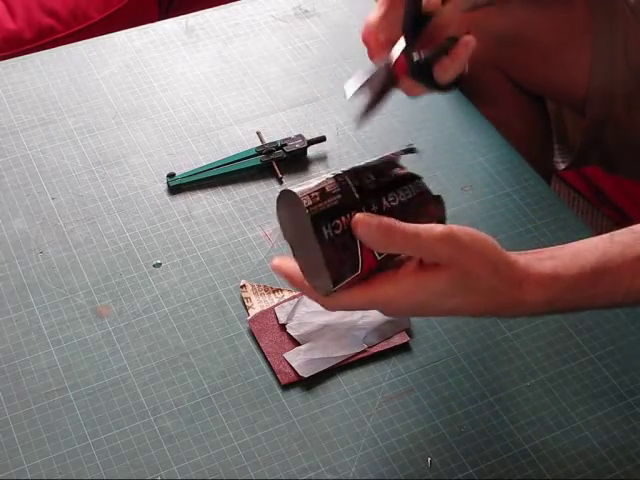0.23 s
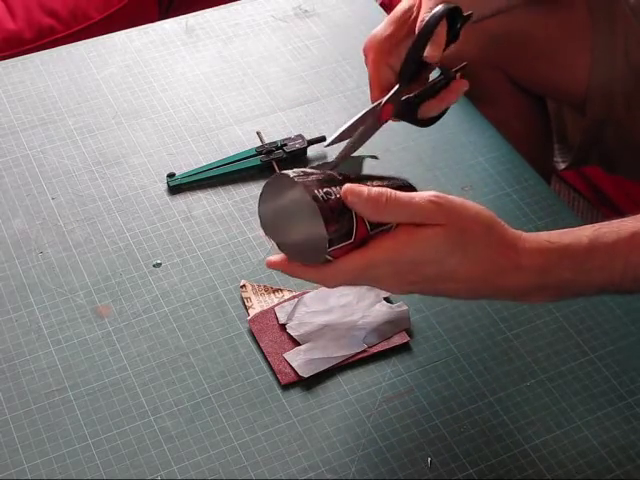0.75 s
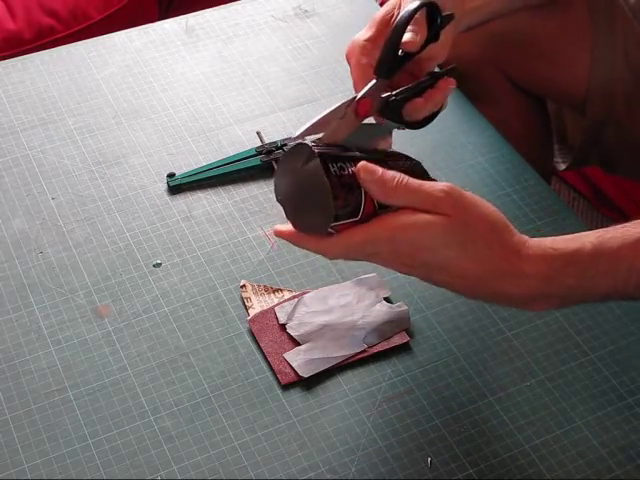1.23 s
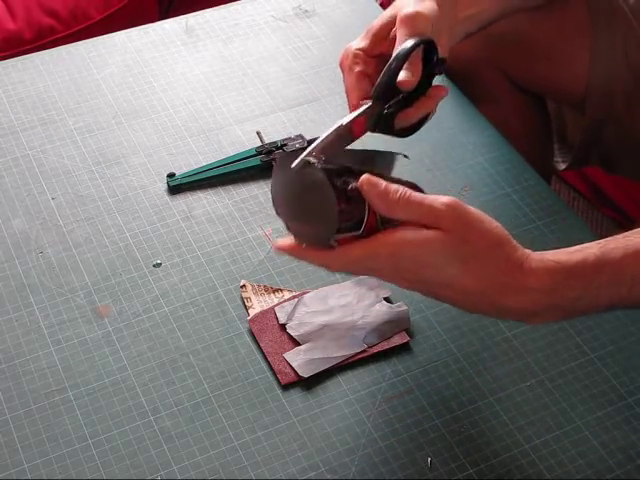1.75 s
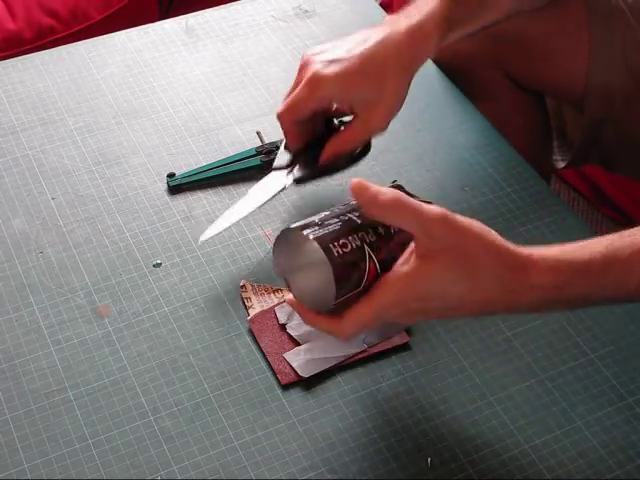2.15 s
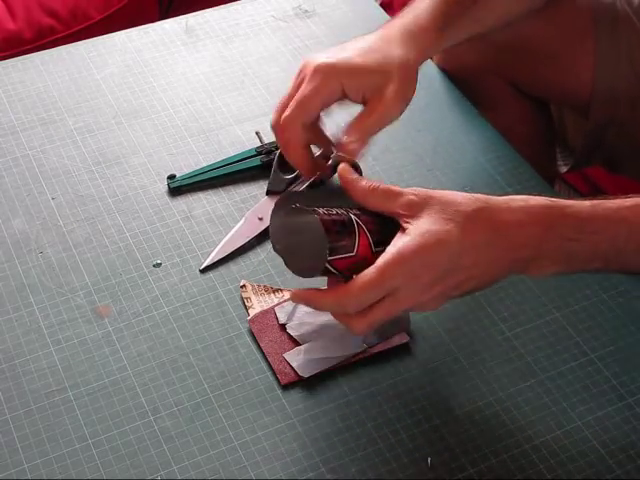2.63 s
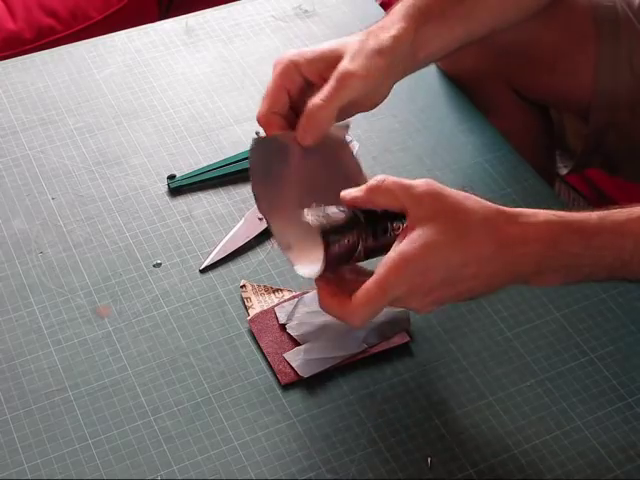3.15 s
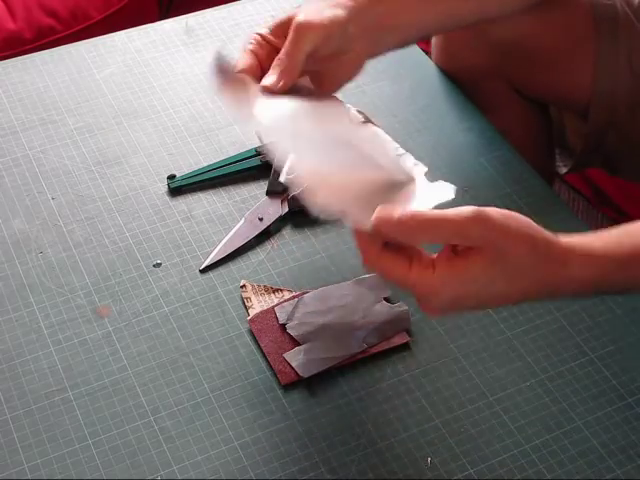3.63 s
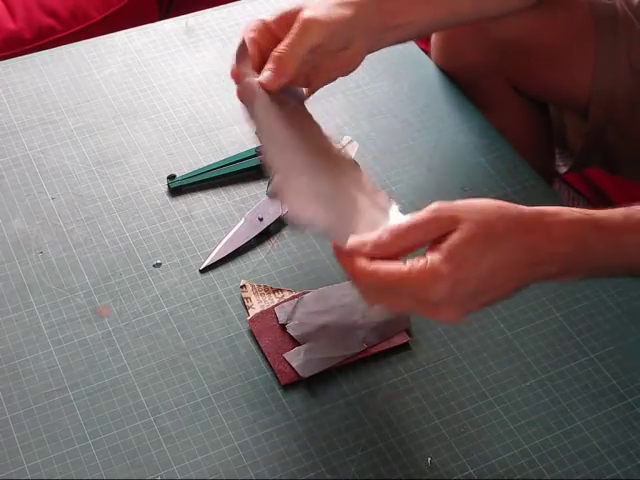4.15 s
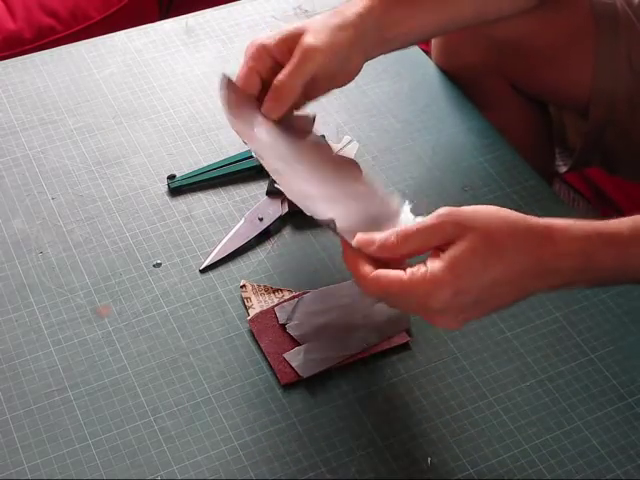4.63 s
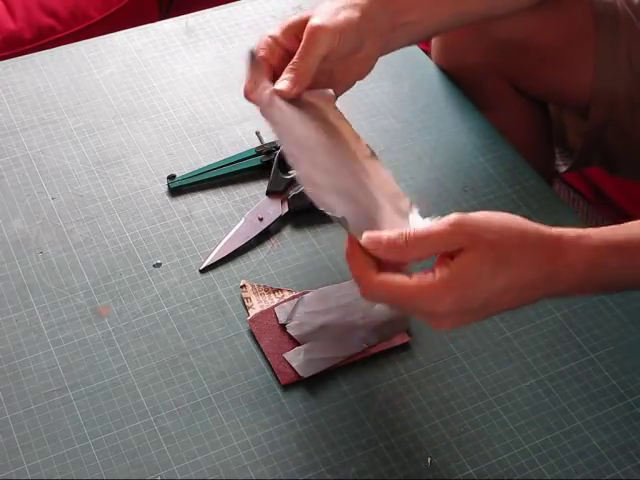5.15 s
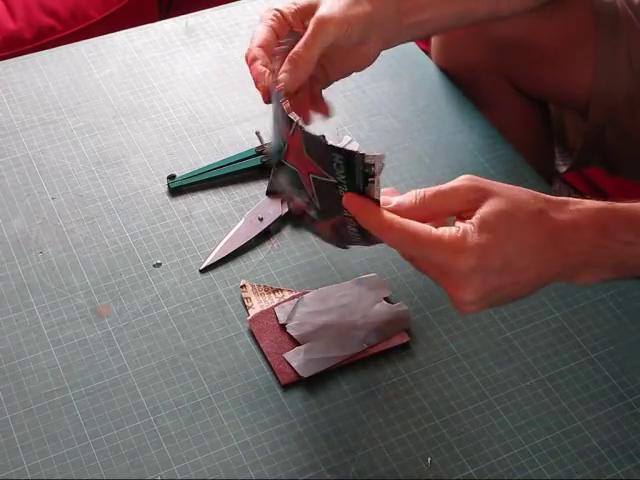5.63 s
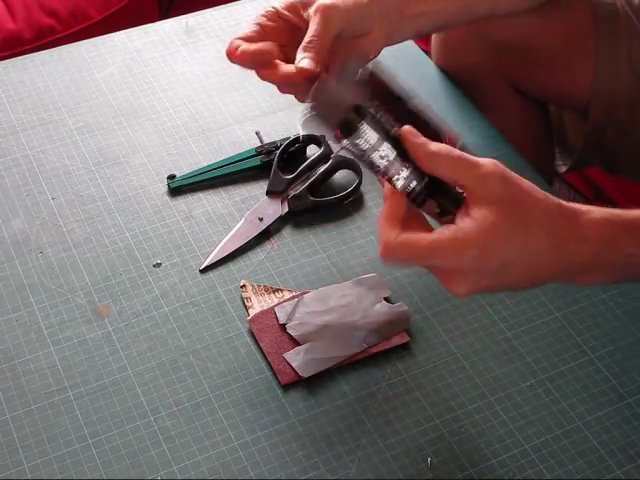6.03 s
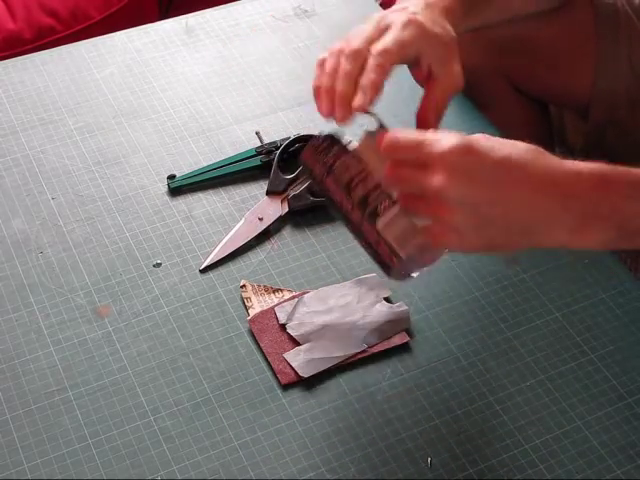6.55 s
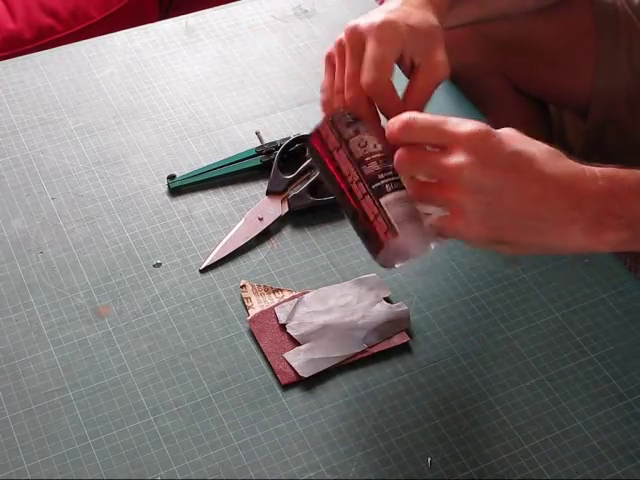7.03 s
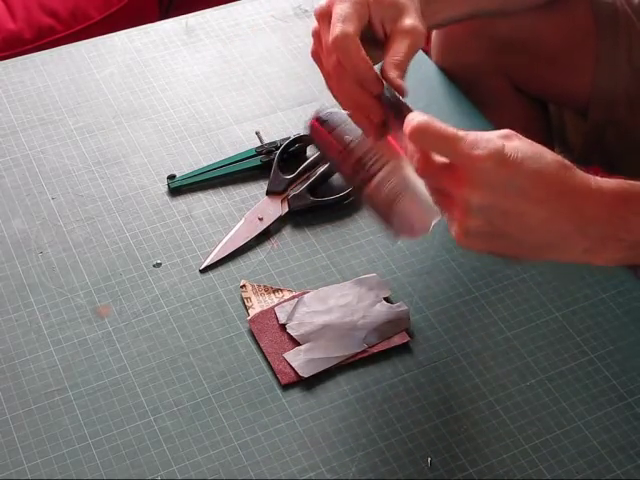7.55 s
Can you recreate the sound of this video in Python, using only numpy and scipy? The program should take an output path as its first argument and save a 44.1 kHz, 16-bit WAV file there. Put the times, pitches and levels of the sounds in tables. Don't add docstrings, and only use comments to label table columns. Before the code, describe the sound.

Scissors cut a thin drinks can: ticks, sharp pops, short scrapes and a narrow metallic singing. The scissors are laid down with woody knocks and a brief steel clatter. The sheet is then pulled flat and flexed with very loud snaps and crackling, turned over, and fades into light crinkles. Small room, close cheap microphone, steady hiss, harsh distorted peaks.

```python
import sys
import numpy as np
from scipy import signal
from scipy.io import wavfile
from scipy.ndimage import uniform_filter1d, map_coordinates

SR = 44100
rng = np.random.default_rng(int(sys.argv[2]) if len(sys.argv) > 2 else 0)


def gain_from_decibels(decibels):
    exponent = np.asarray(decibels, float) / 20
    return 10 ** exponent


def unload_audio(sound):
    columns = np.transpose(np.atleast_2d(sound))
    steps = np.round(np.clip(columns, -1, 1) * 32767)
    wavfile.write(sys.argv[1], SR, steps.astype(np.int16))


N = 343526


# until_s, tube_share_of_pops_db, room_share_db,
# low_share_of_creases_db, fading_of_a_squeeze_db
SHAPES = [
    (2.4, -8, -1, -25, -8),
    (5.7, -26, 3.5, 3.5, -3.5),
    (8, -8, 3, -7.5, -3),
]


def shape_at(s):
    ends = [row[0] for row in SHAPES]
    return SHAPES[min(np.searchsorted(ends, s), len(SHAPES) - 1)][1:]


def buckles(rows, over_db, crack_s, t60, shimmer_db, steep=False, less_db=0, headroom_db=np.zeros(N)):
    out = np.zeros((2, N))
    camera_filter = signal.firwin(41, 5150, fs=SR)
    for s, db, low_db, high_db, *far_db in rows:
        tube_db, room_db = shape_at(s)[:2] + np.array([less_db, sum(far_db)])
        shares = gain_from_decibels(np.array([low_db, -3, high_db, tube_db]))
        pop = shares @ parts(crack(crack_s, t60, shimmer_db))
        even = shares @ parts(np.eye(1, 3000)[0])
        heard = np.convolve(pop[:760], camera_filter).reshape(-1, 4)
        steps = abs(np.diff(heard, axis=0))
        if steep:
            size = gain_from_decibels(db) / steps.max(0).min()
            start = s - (steps.argmax() - 18) / SR
        else:
            wanted = gain_from_decibels(min(db + over_db, -1)) / abs(heard).max(0).min()
            without_wrapping = .95 * gain_from_decibels(headroom_db[int(s * SR)]) / steps.max()
            size = min(wanted, without_wrapping)
            start = s - 9 / SR
        add(out[0], start, size * pop)
        add(out[1], start, size * gain_from_decibels(room_db) * even)
    return thin(out)


# steepest_s (time of the steepest step), steepest_step_db, low_share_db,
# high_share_db, room_share_db
SNAPS = [
    (.692, 1.2, -30.5, -2.5, 1),
    (1.7009, 1.5, -15, 3, -6),
    (3.6935, 2, -3, -0.5, 0.5),
    (4.1213, 1, -13, 1.5, 1),
    (4.2862, 4, -21, 0.5, -1),
    (4.8826, 3, -13.5, 4, -1.5),
    (5.1391, 1, -17, 3.5, -4.5),
    (5.2996, 1, -16, -0.5, -1.5),
    (5.7609, 1.1, -35, 36, 1.5),
    (7.6672, 1.1, -52, 5.5, -5),
]


def snaps(softer):
    s, step_db, *colour = np.transpose(SNAPS)
    gain_lost_db = ducking_db(softer)[(s * SR).astype(int)]
    step_db = np.clip(step_db, .7, 4.5) + gain_lost_db
    return buckles(zip(s, step_db, *colour), 0, 0.0065, 0.021, -27.5, steep=True, less_db=-3.5)


# start_s, peak_db, low_share_db, high_share_db
CUT_POPS = [(.0748, -23.5, -40, -28), (.271, -17, -14.5, -4), (.5487, -38, -10, -10), (.632, -16, -7.5, -5),
            (.819, -23.5, -17, -9), (.8704, -26, -30, -5), (.8828, -9, -46, -4.5), (1.0411, -24, -35, -14),
            (1.111, -31, -4, 8), (1.1664, -29.5, 2.5, 0), (1.2414, -109, -13, -2), (1.2509, -25, -10, 12),
            (1.2604, -24, -5, -8), (1.2948, -25, -27, 43), (1.4277, -22, 7, 15.5), (1.4879, -29, 14, 19.5),
            (1.579, -28, -15, -15), (1.5972, -38, -2.5, -26), (1.617, -8, -13.5, 7.5),
            (1.8316, -5, -45, -3), (1.8362, -8, -26, 0), (1.8455, -11, -30, -5), (1.855, -10, -46, -34),
            (1.875, -21, -34, -8), (1.941, -22, -38, -37), (1.9774, -27, -30, -20), (2.1445, -48, -10, -10),
            (2.245, -35.5, 3, 3)]
# start_s, peak_db, low_share_db, high_share_db
FLEX_POPS = [(3.0302, -37, 2, -13.5), (3.217, -36.5, 3, -1), (3.4037, -16, -10, -11.5),
             (3.5602, -32, 28, 3), (3.602, -35, 12, -20), (3.6209, -12.5, -15, -16.5),
             (3.628, -12.5, -7.5, -9.5), (3.656, -11.5, 7, -29), (3.718, -1, -22.5, 21),
             (3.7675, 2, -22.5, -0.5), (3.838, -17.5, 3, -4), (4.069, -13, -11, 0), (4.0874, -7, -9, -6),
             (4.118, -8, -10, 0), (4.1462, -12, 0, -5), (4.153, -10, -20, 3), (4.172, -15, -10, 0),
             (4.184, -15, -10, 0), (4.284, -5, -15, 0), (4.6202, -23.5, -2.2, -13), (4.6503, -25.5, 6, -28),
             (4.7155, -29.5, 26, -11), (4.7529, -5, -27, -3), (5.0609, -16.5, -16.5, -10),
             (5.09, -12, -57, -1), (5.2626, -10.5, 3, -17), (5.2713, -18, 6, 0), (5.343, -9, -6, -5),
             (5.452, -21.5, -7.5, -2), (5.5235, -26, -4, 0)]
# start_s, peak_db, low_share_db, high_share_db, and for some
# a further room_share_db
CURL_POPS = [(5.7585, -11, -30, 10), (5.8925, -20.5, -33, -1), (5.916, 8, -7.5, 0.5),
             (6.0451, -11, -15, -11), (6.0596, -4.5, -31, 10), (6.0653, -1, -7, 9),
             (6.1101, -4, 4, -20, -10), (6.137, -14.5, -40, -31), (6.2375, -4, -30, 8.5),
             (6.2525, -13, -32, -25), (6.3065, -16, -16, -8), (6.3653, -20.5, -40, 33, -8),
             (6.398, -33, -30, 10, -6), (6.42, -33, -30, 10, -6), (6.4545, -34, -30, 15),
             (6.6467, -26.5, -22, 38.5), (6.6745, -31, -11, -17), (6.7206, -15, -38, 21, -5),
             (6.9162, -31.5, -6, 5), (6.96, -20.5, -26, 21), (7.1088, -28, -8, 31), (7.1878, -27.5, 5, 18),
             (7.314, -36.5, -17, 10), (7.4146, -32.5, -16, 18), (7.5575, -46, 0, 0),
             (7.643, -12.5, -24, -1.5), (7.665, -12, -30, 8), (7.6858, -33, -30, 3)]


def pops(creases):
    rows = CUT_POPS + FLEX_POPS + CURL_POPS
    return buckles(rows, 4.0, 0.004, 0.043, -6, headroom_db=ducking_db(creases))


def crack(crack_s, t60, shimmer_db):
    t = np.arange(3000) / SR
    rise = 1 - np.exp(-t / .0003)
    fading = gain_from_decibels(-60 * t / crack_s) + gain_from_decibels(shimmer_db - 60 * t / t60)
    return rng.standard_normal(len(t)) * rise * fading


# pitch_hz, width_hz, level_db
TUBE = [(1050, 90, -13), (1155, 70, -2.5), (1250, 70, -1.5), (1335, 70, 0), (1470, 90, -7)]
# from_hz, to_hz
RANGES = [(330, 1050), (1100, 2900), (2900, 5450)]


def parts(burst):
    hz, width, db = np.transpose(TUBE)
    luck = rng.random((2, len(TUBE)))
    bands = []
    for edges in RANGES:
        band = signal.butter(2, edges, "band", fs=SR, output="sos")
        bands.append(signal.sosfilt(band, burst))
    bands[1] = -bands[1]
    t60 = np.log(1000) / np.pi / np.maximum(width, 18)
    tube = ring(hz * (.96 + 0.08 * luck[0]), db + 6 * luck[1], t60, 0, len(burst) / SR + 1e-6)
    return np.array([part / np.linalg.norm(part) for part in bands + [tube]])


# start_s, peak_db, pitch_hz, t60_s
PANELS = [(0.271, -15, 1280, 0.026), (0.631, -20.5, 1230, 0.1), (0.693, -2.5, 3600, 0.042),
          (0.882, -26, 1310, 0.066), (1.111, -25, 1150, 0.043), (1.293, -21.5, 1220, 0.15),
          (1.428, -28, 1280, 0.055), (1.614, -12, 1170, 0.06), (1.833, -8, 1140, 0.05),
          (1.845, -10, 1350, 0.076), (3.403, -15.5, 934, 0.087), (3.624, -6, 2160, 0.05),
          (3.717, -11, 3490, 0.05), (4.069, -25, 1830, 0.15), (4.148, -5, 2105, 0.03),
          (4.287, 9.5, 3986, 0.029), (4.65, -20, 802, 0.05), (4.715, -21, 670, 0.047),
          (4.751, -5.5, 2480, 0.038), (4.884, -3.5, 1465, 0.05), (5.088, -4.5, 2200, 0.11),
          (5.141, 0, 2230, 0.05), (5.262, -19.5, 666, 0.11), (5.302, 3, 2220, 0.05),
          (5.343, -3, 2770, 0.025), (5.523, -22, 1900, 0.03), (6.058, -6, 3150, 0.046),
          (6.138, -10, 1450, 0.02), (6.252, -8, 1334, 0.03), (6.959, -11.5, 4100, 0.038)]
PANEL_DB, PANEL_SPREAD = -12, .17


def panels():
    out = np.zeros(N)
    luck = rng.random((len(PANELS), 3, 6))
    for (s, db, hz, t60), (a, b, c) in zip(PANELS, luck):
        pitches = hz * (1 + PANEL_SPREAD * (a - .5))
        t60s = np.clip(t60, .015, .06) * (.6 + .8 * c)
        add(out, s, gain_from_decibels(db + PANEL_DB) * ring(pitches, -8 * b, t60s, 0, 4000 / SR))
    return out


# start_s, length_s, level_db, high_share_db,
# tube_share_db
SQUEEZES = [(-.05, .2, -32, 8, 4), (0.65, 0.26, -31, -18, 0.5), (0.89, 0.16, -26, 8, -3),
            (1.244, 0.13, -52, 31, 21.5), (1.424, 0.13, -37, 7, 7), (1.58, 0.05, -32, 6, 2),
            (1.698, 0.12, -32, 5, -3), (1.831, 0.11, -29, 6, 2), (3.408, 0.052, -62, -2, 3),
            (3.615, 0.21, -28, 2, -12.5), (3.714, .12, -25, 10, -20), (4.112, 0.03, -25, 11, -10),
            (4.143, .11, -20, 6, -20), (4.282, 0.09, -19.5, 11, -23), (4.612, 0.031, -34.5, -18, 1.5),
            (4.776, 0.054, -25.5, 13.5, -1.5), (4.877, 0.088, -26.5, 12.5, -3.5),
            (5.087, 0.15, -21, 1, -3.5), (5.263, .035, -33, -10, -4), (5.304, 0.14, -37, -10, -4),
            (5.757, 0.084, -22.5, 5, -14), (5.903, 0.14, -26.5, 10, -9), (6.228, 0.04, -28, 8, -8),
            (6.65, .1, -44.5, -11, 9), (6.94, .08, -43.5, 13.5, 10.5), (7.138, 0.12, -50.5, 14, 8.5),
            (7.664, 0.48, -36, 16, 7.5),
            (0.27, 0.037, -44, 5, 3),
    (1.968, 0.12, -49.5, 2, 5.5),
    (2.775, 0.045, -60.5, 21.5, -12),
    (2.987, .08, -56.5, 9, 3),
    (5.446, 0.096, -44, -8, 10),
    (6.042, .04, -26, 6, -4),
    (6.08, 0.25, -33, 12, -9),
    (7.311, .06, -49.5, 14.5, 8),
    (7.395, 0.082, -46.5, 13.5, -2),
]
# low_db, middle_db, high_db, tube_db
SAG_DB = (-6, -7, -10, -2.5)
# low_db, middle_db, high_db, tube_db
RUB_DB = (-57, -55.5, -71.5, -62.5)
SQUEEZE_RISE_S, LET_GO_DB_PER_S = 0.0043, 290


def pressure():
    t = np.arange(N) / SR
    gain = gain_from_decibels(np.array(RUB_DB))[:, None] * np.ones(N)
    for start, length, db, high_db, tube_db in SQUEEZES:
        span = slice(max(round(start * SR), 0), round((start + length + .3) * SR))
        u = t[span] - start
        low_db, tire_db = shape_at(start)[2:]
        sag_db = np.outer(np.add(SAG_DB, tire_db), np.minimum(u / length, 1))
        shares_db = np.array([low_db, 0, high_db, tube_db])[:, None] + sag_db
        let_go_db = LET_GO_DB_PER_S * np.maximum(u - length, 0)
        held = np.minimum(u / SQUEEZE_RISE_S, 1) * gain_from_decibels(db - let_go_db)
        gain[:, span] += held * gain_from_decibels(shares_db)
    return gain


def crinkle(per_s=1500, spread_db=4.0):
    happens = rng.random(N) < per_s / SR
    size = gain_from_decibels(spread_db * np.minimum(rng.exponential(1, N), 3.3)) * happens
    which = rng.integers(0, 6, N)
    layers = np.zeros((4, N))
    for kind in range(6):
        crease = parts(crack(0.0022, 0.062, -37.5))
        layers += signal.oaconvolve((size * (which == kind))[None], crease, axes=1)[:, :N]
    return gain_from_decibels(-3.5) * sum(evened(layer) * gain for layer, gain in zip(layers, pressure()))


def scrape(rows, width, over_db=0):
    s, db, hz = np.transpose(rows)
    t = np.arange(s[0], s[-1], 1 / SR)
    turn = np.exp(2j * np.pi * np.cumsum(np.interp(t, s, hz)) / SR)
    r = np.exp(-np.pi * width / SR)
    noise = rng.standard_normal(len(t)) + 1j * rng.standard_normal(len(t))
    rub = signal.lfilter([1], [1, -2 * r, r * r], noise)
    level = signal.windows.tukey(len(t), .1) * gain_from_decibels(np.interp(t, s, db) + over_db)
    out = np.zeros(N)
    add(out, max(s[0], 0), level * evened((rub * turn).real))
    return out


# start_s, level_db, pitch_hz
SCRAPE = [
    (1.551, -59, 2300),
    (1.582, -29, 2500),
    (1.6, -51, 3210),
    (1.63, -38, 4220),
    (1.69, -39, 4330),
    (1.76, -44, 4480),
    (1.8, -59, 4390),
]


def blades_scrape():
    return scrape(SCRAPE, 700)


# start_s, level_db, pitch_hz
SINGING = [
    [(0.0, -37, 1260), (0.088, -36, 1290), (0.144, -39, 1280), (0.184, -48, 1310), (0.2, -55, 1260)],
    [(0.885, -26, 1290), (0.931, -32, 1260), (0.973, -26, 1270), (1.059, -37, 1290), (1.08, -43, 1290)],
    [(1.245, -37, 1250), (1.299, -33, 1190), (1.317, -40, 1190), (1.36, -39, 1220)],
    [(1.575, -36, 1200), (1.617, -29, 1180), (1.647, -37, 1200), (1.705, -32, 1250), (1.751, -42, 1280),
     (1.811, -39, 1310), (1.82, -28, 1310)],
    [(1.835, -21, 1260), (1.847, -20, 1270), (1.891, -29, 1250), (1.941, -27, 1290), (2.05, -46, 1290)],
    [(6.255, -26, 1280), (6.281, -33, 1290), (6.311, -29, 1270), (6.339, -33, 1260), (6.36, -43, 1250)],
    [(7.645, -29, 1180), (7.707, -41, 1210), (7.78, -40, 1240)],
]
# start_s, level_db, pitch_hz
BLADE_RING = [
    (1.99, -65, 2230),
    (2.03, -50, 2210),
    (2.1, -50, 2150),
    (2.16, -62, 2130),
]


def singing():
    wall = sum(scrape(rows, 75, over_db=-0.8) for rows in SINGING)
    return wall + scrape(BLADE_RING, 70)


# start_s, peak_db, clatter_share_db
KNOCKS = [
    (2.277, -18.5, 1.5),
    (2.288, -17.5, -17),
    (2.324, -16.5, -1),
    (2.351, -23, -20),
    (2.434, -20.5, 1),
    (2.47, -15.5, 2.5),
    (2.484, -16.5, -2),
    (2.526, -49, -15),
]
# pitch_hz, level_db, t60_s
TABLE = [(133, -9.5, 0.25), (191, -11, 0.19), (238, 1, 0.6), (323, -3.5, 1), (408, 0, 0.35),
         (456, 3.5, 0.2), (529, 2.5, 0.17), (586, 1.5, 0.22), (668, 2, 0.22), (780, -2.5, 0.18),
         (1190, -10, 0.16), (1250, -9, 0.14), (1860, -19, 0.17), (2090, -11, 0.12)]


def knocks():
    out = np.zeros(N)
    hz, db, t60 = np.transpose(TABLE)
    for s, blow_db, clatter_db in KNOCKS:
        wood = ring(hz, db + 6 * rng.random(len(hz)), t60 * 0.33, rng.random(len(hz)), 0.38)
        wood *= 1 - np.exp(-np.arange(len(wood)) / SR / 0.0018)
        steel = gain_from_decibels(np.array([-9.0, 0.0, 0, -9])) @ parts(crack(0.015, 0.037, -32))
        add(out, s, gain_from_decibels(blow_db) * wood / np.sqrt(np.mean(wood[:400] ** 2)))
        add(out, s, gain_from_decibels(blow_db + clatter_db + 10) * steel / abs(steel).max())
    return out


def thin(x):
    return signal.sosfilt(signal.butter(2, 260, "high", fs=SR, output="sos"), x)


def ring(hz, db, t60, phase, length_s):
    t = np.arange(round(length_s * SR))[:, None] / SR
    return (gain_from_decibels(db - 60 * t / t60) * np.sin(2 * np.pi * (hz * t + phase))).sum(1)


def evened(x):
    return x / np.sqrt(np.mean(x ** 2) + 1e-20)


def read(points, hz):
    f, value = np.transpose(points)
    return np.interp(np.log(hz + 1), np.log(f + 1), value)


def add(mix, s, sound):
    part = mix[round(s * SR):][:len(sound)]
    part += sound[:len(part)]


# pitch_hz, t60_s
ROOM = [(200, 0.12), (700, 0.25), (1800, 0.32), (4500, 0.27)]


def room(x):
    taps = np.zeros((3, SR // 2))
    slots = np.arange(200, SR // 2 - 20, 12)
    at = slots + rng.integers(0, 12, (3, len(slots)))
    np.put_along_axis(taps, at, rng.choice([-1., 1.], at.shape), 1)
    hz, t, z = signal.stft(taps, SR, nperseg=256)
    dying = gain_from_decibels(-60 * t / read(ROOM, hz)[:, None])
    tails = signal.istft(z * dying, SR, nperseg=256)[1]
    phase = np.arange(N) * 7 / SR + np.arange(3)[:, None] / 3
    turns = np.cos(np.pi * phase) * np.sqrt(2 / 3)
    return signal.fftconvolve(x * turns, tails / np.linalg.norm(tails[0]), axes=1)[:, :N].sum(0)


# pitch_hz, level_db (per Hz)
HISS = [(15, -49), (25, -5), (169, 2.5), (445, -2), (498, -1.5), (763, -3.5), (1250, -3), (1600, -7.5),
        (2940, -13.5), (4510, -9.5), (5400, -10), (7020, -54.5), (11900, -120)]
HISS_DB = -46.5


def hiss():
    frames, hz = N // 256 + 5, np.fft.rfftfreq(1024, 1 / SR)
    a, b, patches = rng.standard_normal((frames, 513, 3)).T
    patches = evened(uniform_filter1d(uniform_filter1d(patches, 10, 0), 12, 1))
    z = (a + 1j * b) * gain_from_decibels(read(HISS, hz)[:, None] + 0.63 * patches)
    return gain_from_decibels(HISS_DB + 1.0) * evened(signal.istft(z, nperseg=1024, noverlap=768)[1][:N])


def ducking_db(x, threshold_db=-25, share=0.51, recovery_db=95):
    power_db = 10 * np.log10(signal.lfilter([.01], [1, -.99], x ** 2) + 1e-12)
    fall = np.arange(N) * recovery_db / SR
    held_db = np.maximum.accumulate(power_db + fall) - fall
    over_db = np.maximum(held_db - threshold_db, 0)
    return share * signal.lfilter([.004], [1, -.996], over_db)


CAMERA_HZ = 11024.4


def sampled(heard):
    narrow = signal.oaconvolve(heard, signal.firwin(41, 5300, fs=SR), "same")
    coarse = np.arange(0, N, SR / CAMERA_HZ)
    values = np.clip(map_coordinates(narrow, [coarse], order=3), -1, 1)
    joined = np.interp(np.arange(N), coarse, values)
    round_about = np.interp(np.arange(N), coarse, np.unwrap(values, period=2))
    jumps = (round_about + 1) % 2 - 1 - joined
    level = np.sqrt(signal.lfilter([.005], [1, -.995], joined ** 2))
    joined += gain_from_decibels(-36.5) * level * rng.standard_normal(N)
    smooth = signal.oaconvolve(joined, signal.firwin(301, 15950, fs=SR), "same")
    smooth_jumps = signal.oaconvolve(jumps, signal.firwin(301, 16300, fs=SR), "same")
    return np.clip(smooth + smooth_jumps, -1, 1)


def scene():
    table = knocks()
    creases = thin(crinkle()) + blades_scrape() + panels()
    pop, pop_far = pops(creases)
    sung = singing()
    to_room = gain_from_decibels(-1.5) * pop_far + gain_from_decibels(2.5) * table + gain_from_decibels(-2.5) * creases + gain_from_decibels(-9) * sung
    softer = pop + table + creases + sung + room(to_room)
    snap, snap_far = snaps(softer)
    return (softer + snap + room(snap_far))[None]


def low_pass(x):
    return signal.sosfilt(signal.butter(12, 16680, fs=SR, output="sos"), x)


def record(dry):
    down_db = ducking_db(dry[0])
    heard = dry[0] / gain_from_decibels(down_db) + hiss() / gain_from_decibels(0.33 * down_db)
    wrapped = sampled(heard)
    return low_pass(wrapped[None])


dry = scene()
out = record(dry)
unload_audio(out)
```